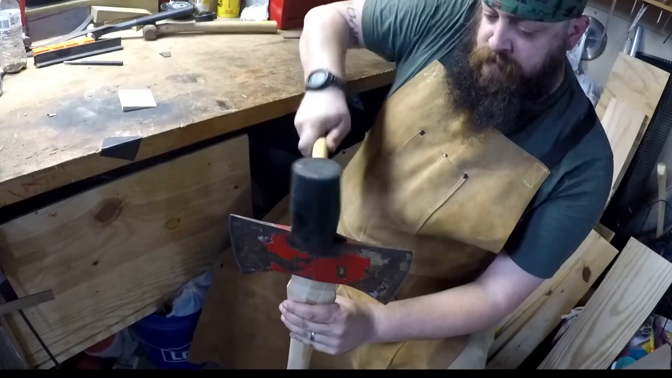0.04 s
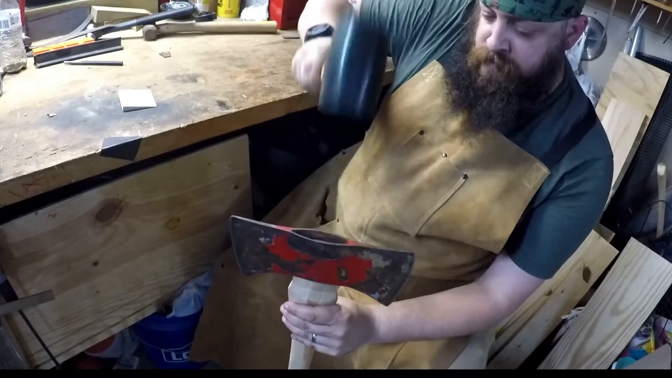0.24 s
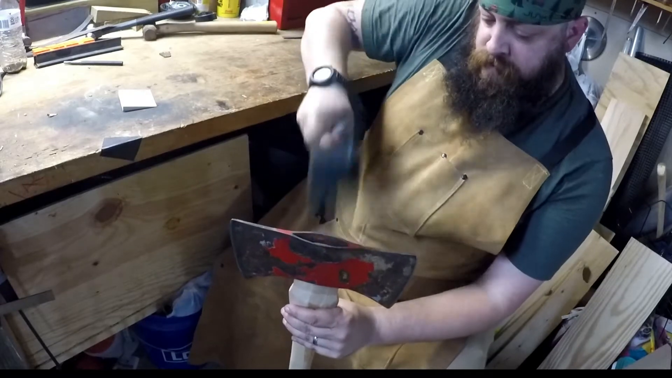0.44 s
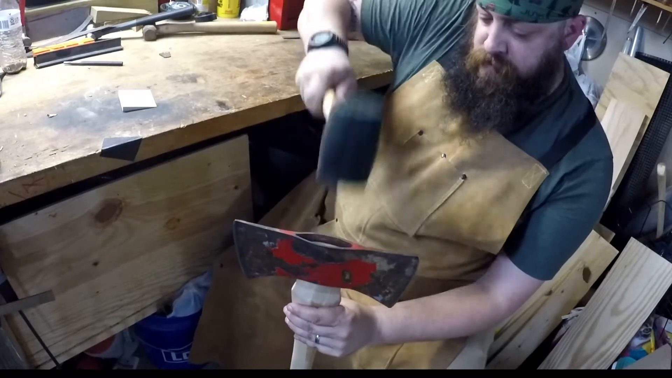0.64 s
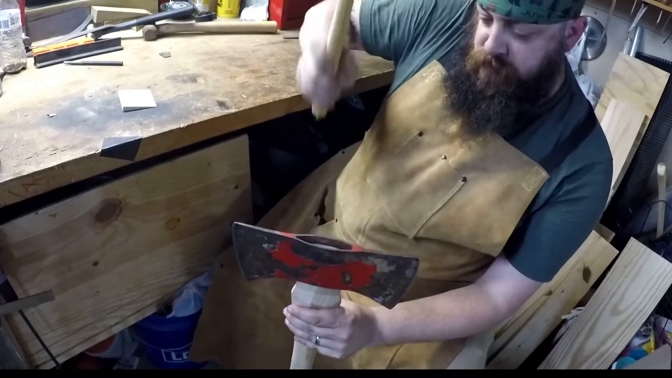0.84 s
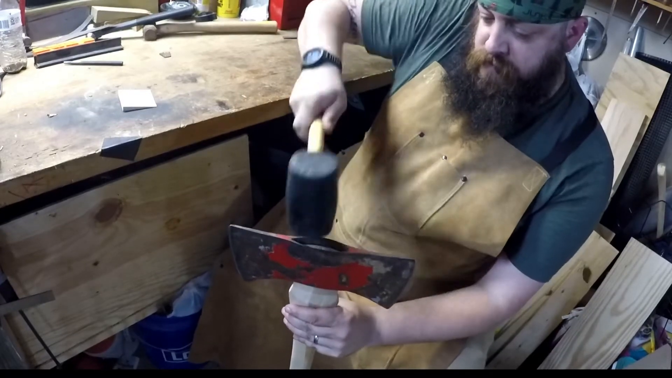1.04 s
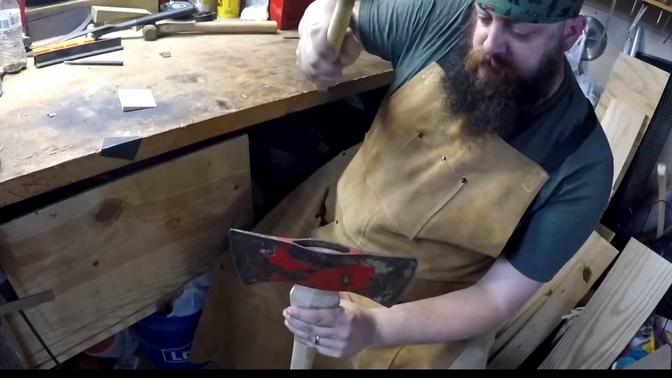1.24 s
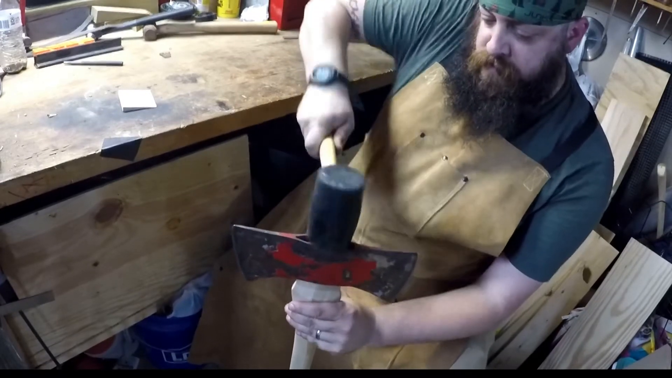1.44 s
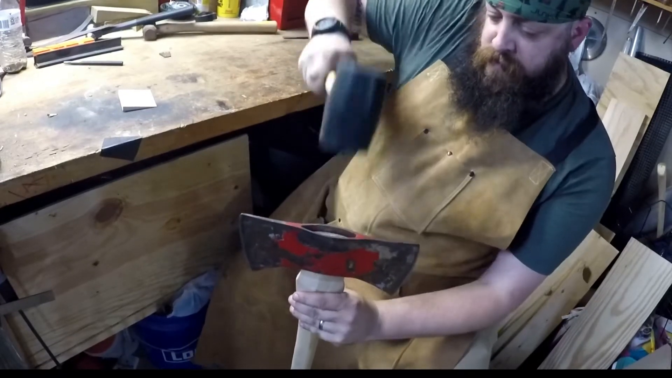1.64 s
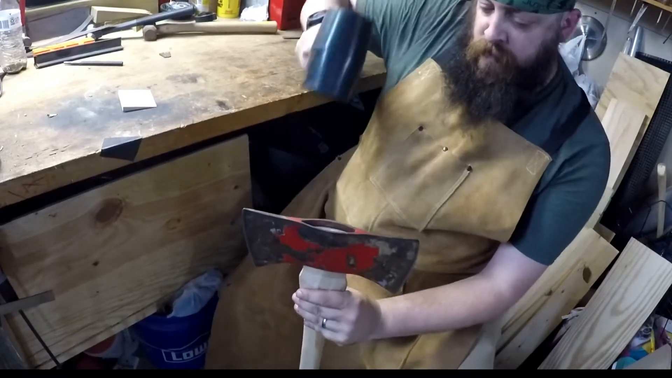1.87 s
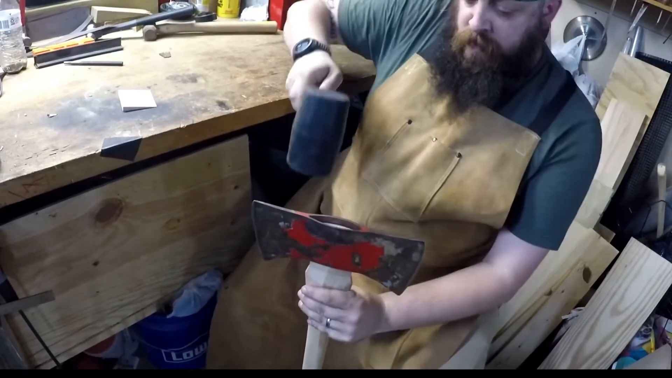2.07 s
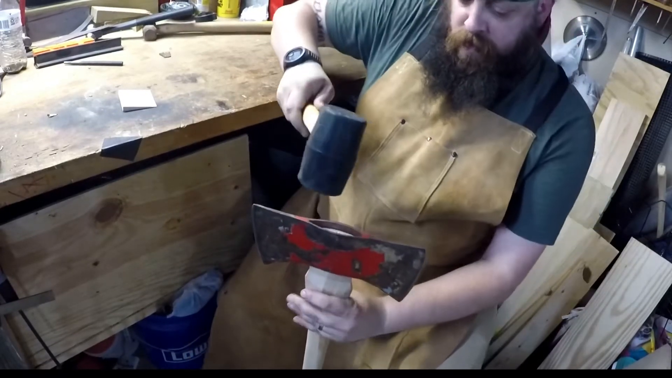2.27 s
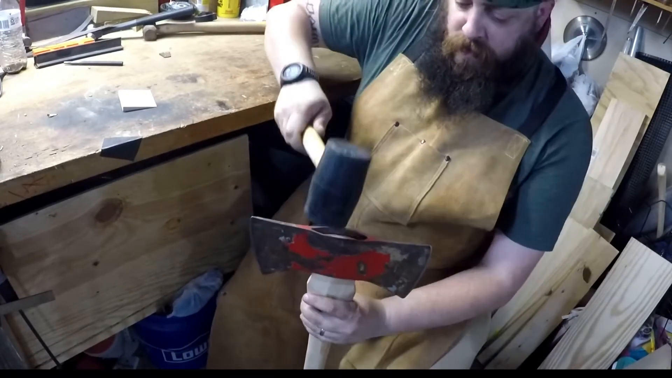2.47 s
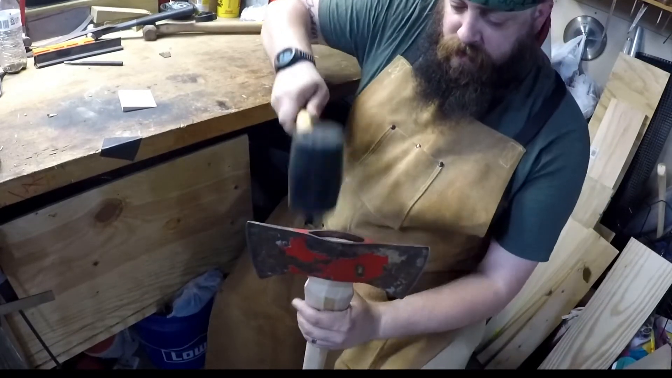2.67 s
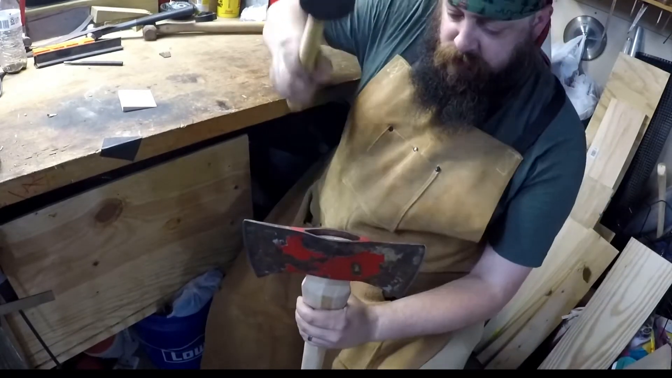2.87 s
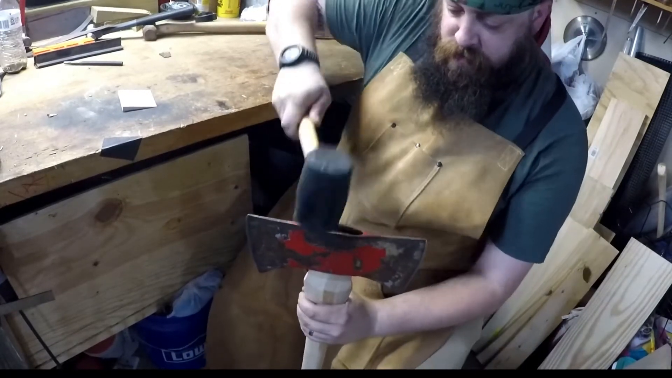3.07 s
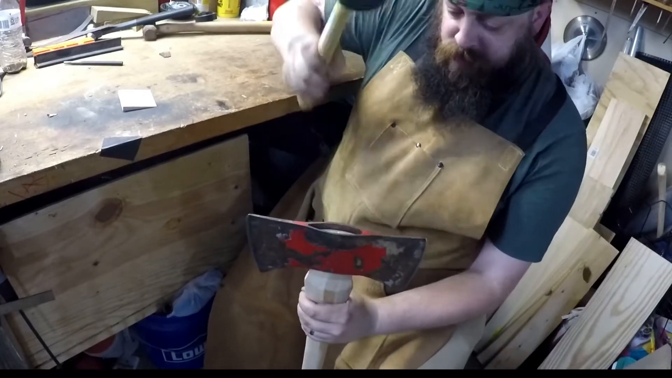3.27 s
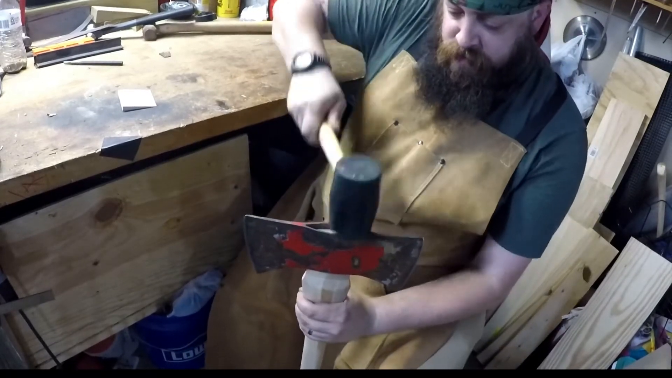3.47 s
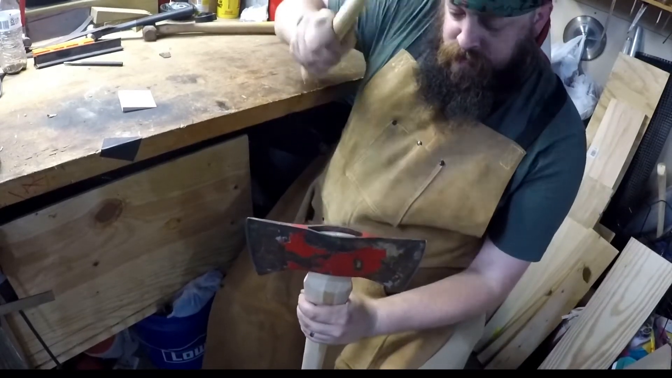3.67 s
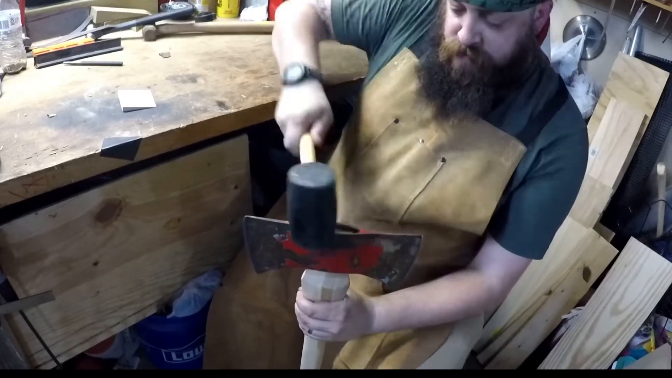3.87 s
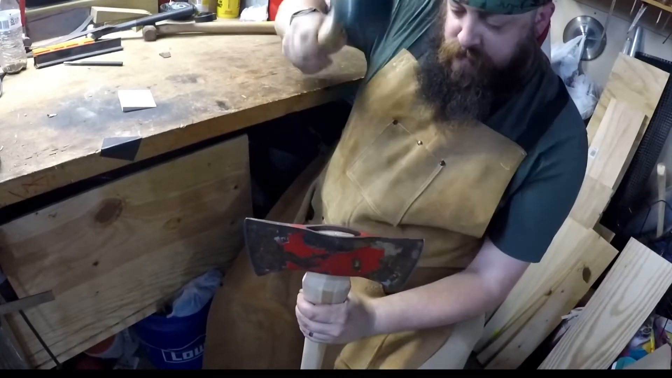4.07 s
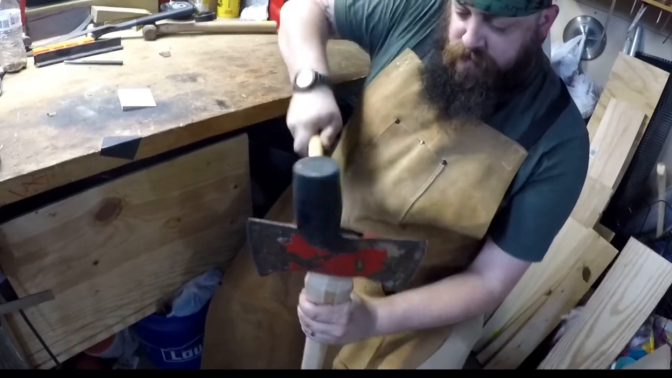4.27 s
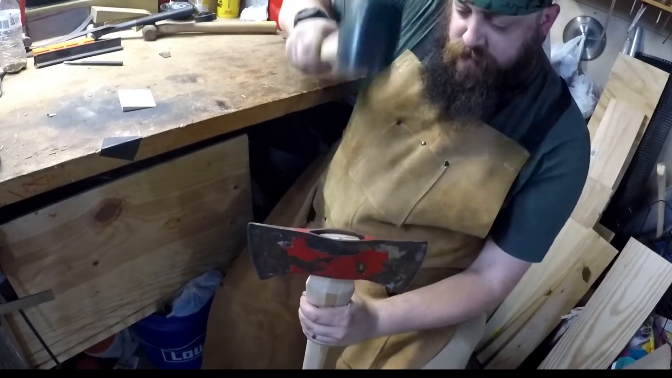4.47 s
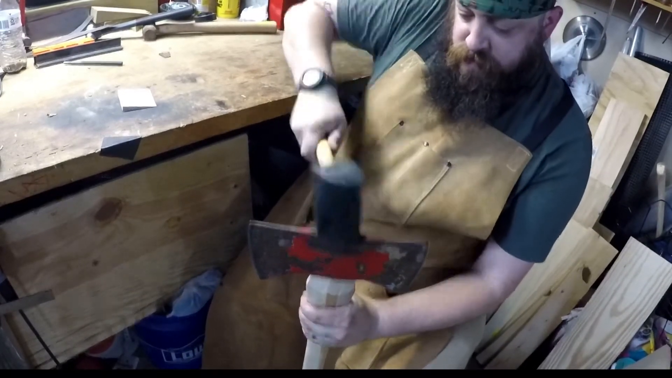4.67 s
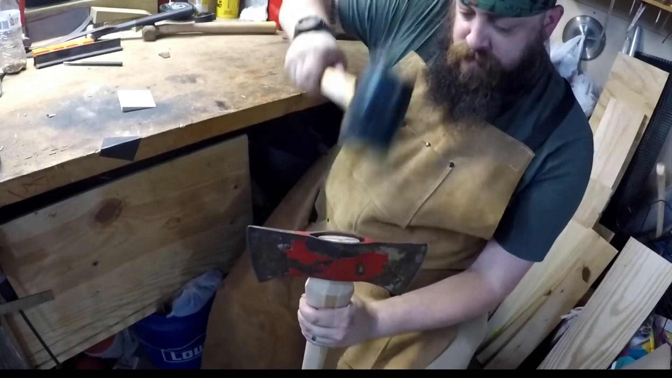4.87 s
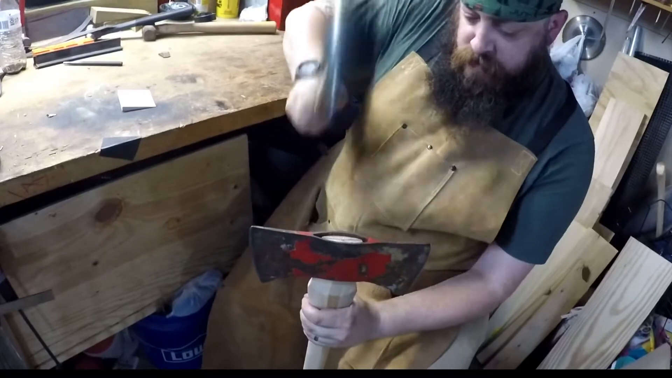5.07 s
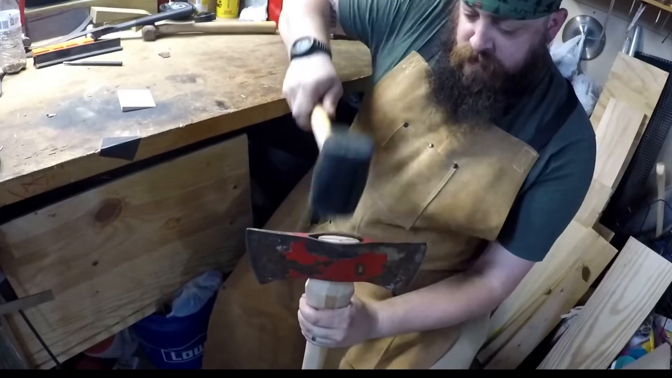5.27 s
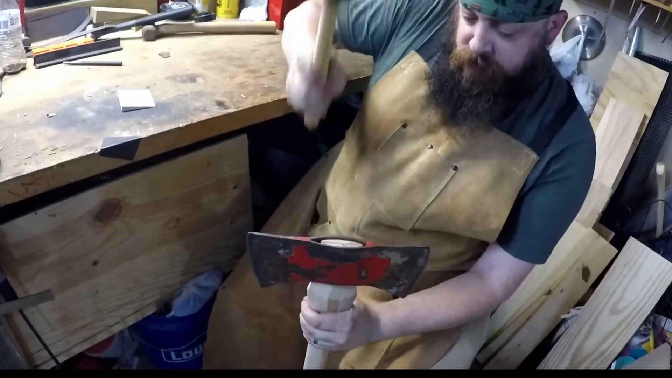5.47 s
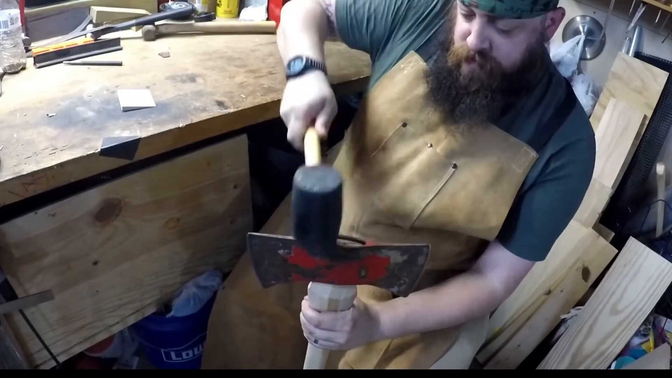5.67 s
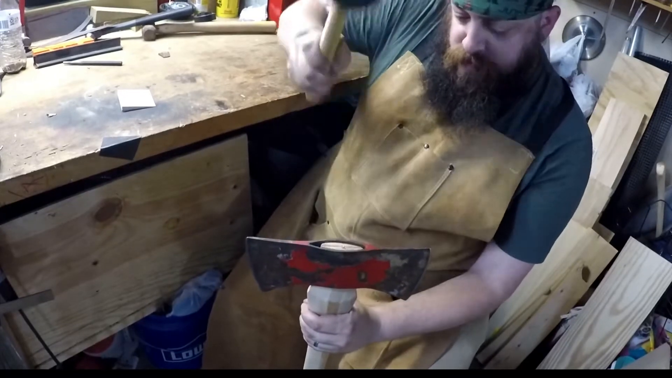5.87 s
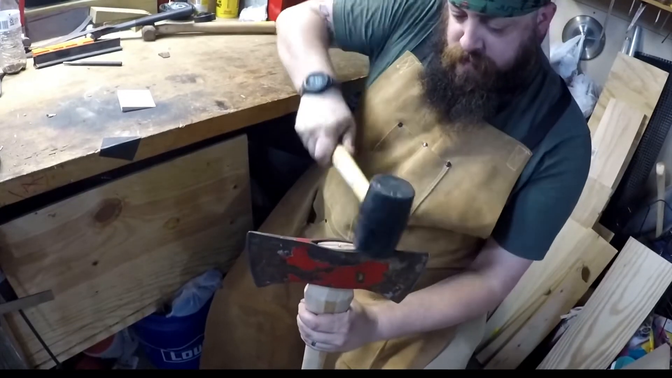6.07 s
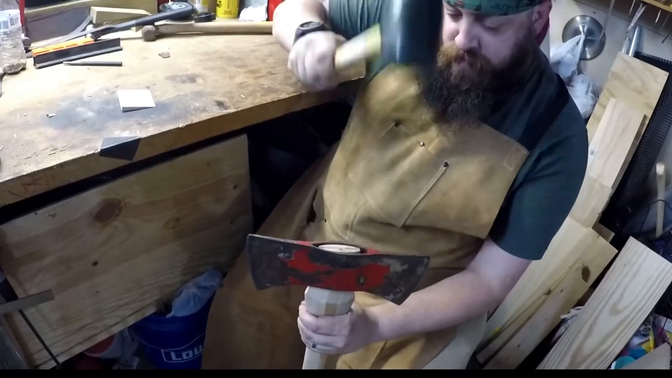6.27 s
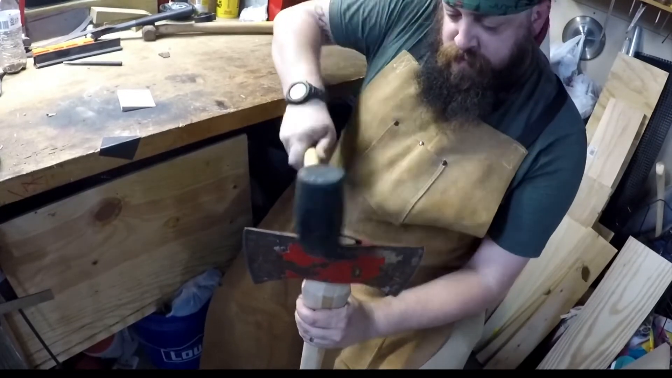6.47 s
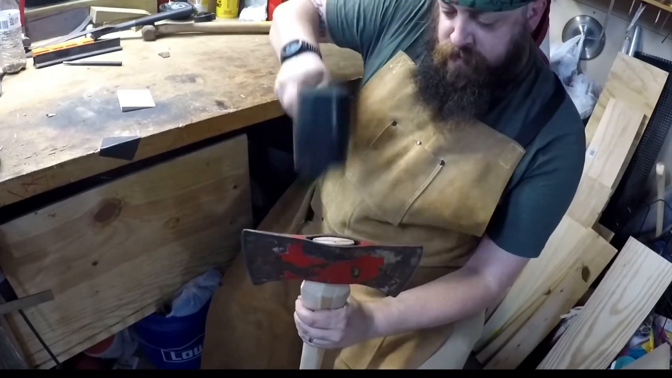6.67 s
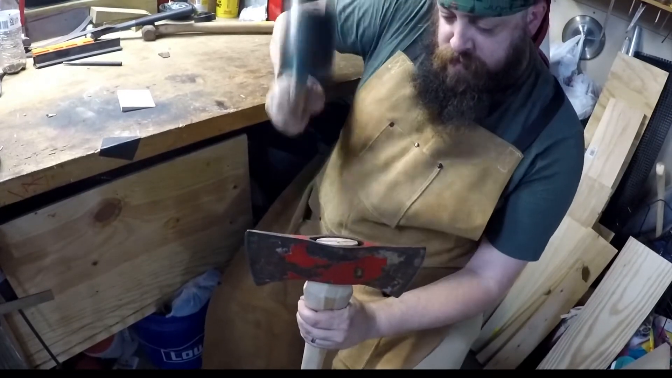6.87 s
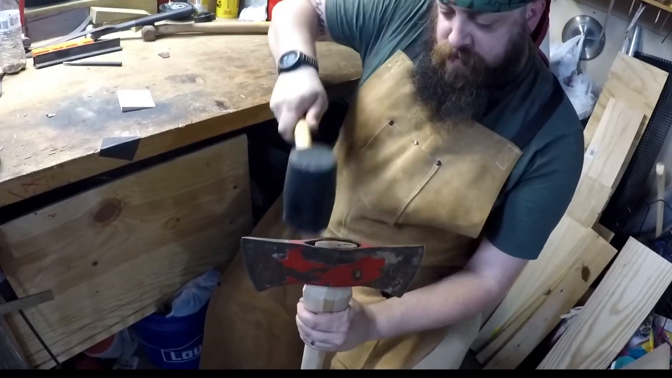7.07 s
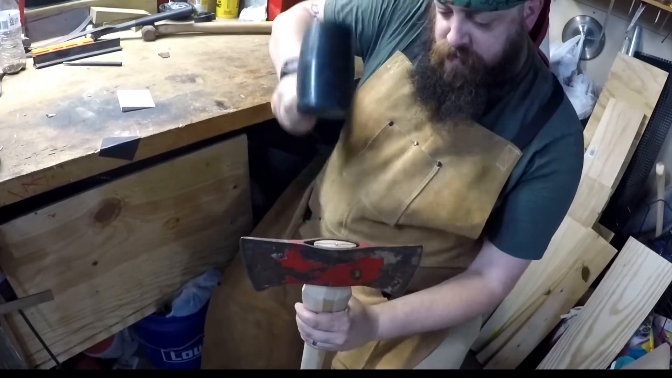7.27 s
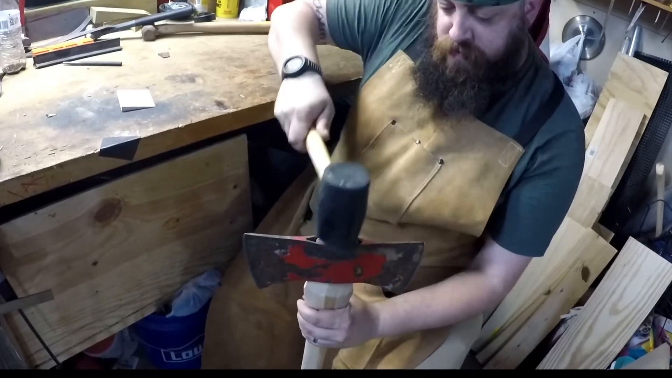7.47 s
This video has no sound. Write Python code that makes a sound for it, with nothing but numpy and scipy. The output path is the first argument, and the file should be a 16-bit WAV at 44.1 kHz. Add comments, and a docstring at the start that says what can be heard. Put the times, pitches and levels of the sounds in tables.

```python
"""Sharp, booming knocks, about two a second: a rubber mallet drives a steel axe head onto its handle.
Each blow rings the wooden handle and the low modes of a small workshop; the head cracks against
the wood and rings, and the walls answer briefly. Boom and knock fade as the head seats.
Hand and apron rustle in a pause while the grip changes, over a low room rumble.
A close camera overloads with a brief click at each attack, lifts the bass and limits the blows."""
import sys
import numpy as np
from scipy import signal
from scipy.fft import rfft, irfft
from scipy.io import wavfile
from scipy.ndimage import uniform_filter1d, minimum_filter1d

SR = 44100
rng = np.random.default_rng(int(sys.argv[2]) if len(sys.argv) > 2 else 0)


def transcribe(u):
    """Save the signal u as a 16-bit wav file named by the first command-line argument.

    u: samples, shape (n,) or (channels, n), limited to [-1, 1]; the rate is SR.
    q: integer samples, one column per channel.
    """
    v = np.clip(np.atleast_2d(u).T, -1, 1)
    q = np.round(v * 32767).astype(np.int16)
    wavfile.write(sys.argv[1], SR, q)


N = 331584
TIME = np.arange(N) / SR
AGE = np.arange(int(1.2 * SR)) / SR  # seconds since a blow


def mallet(settle_s=0.018):
    """Every blow: thump, wooden clack, crack, wall wash, steel ring and chink, plus an overload click."""
    # Each row: start in seconds, thump force in dB, contact hardness in dB.
    blows = [(0.3562, 0, 2.5), (0.8218, 0.5, 6), (1.3004, 2, 3), (2.4272, -4, -44), (2.8629, 0.5, -7),
             (3.2788, 0, 0.5), (3.7062, 0.5, -2.5), (4.1436, 0.5, 1), (4.574, 1, -0.5), (5.0143, 1.5, -2.5),
             (5.4555, 1, -7.5), (5.9, 0.5, -4.5), (6.349, 1.5, -2.5), (6.806, 1.5, -2.5),
             (7.2347, 3.5, -9.5)]
    # Three spectra. Each row: frequency in Hz, density in dB.
    clack_colour = [(200, -31.5), (450, 16), (750, 7.5), (1100, 4.5), (1600, 3.5), (2200, -10.5),
                    (3000, -17), (5000, -17.5), (7500, -23.5), (12000, -59)]
    wall_colour = [(60, -23), (200, 12), (450, -1), (850, -2.5), (1700, -7), (2400, -14.5), (3500, -20),
                   (4800, -11.5), (6200, -14.5), (7600, -26), (9300, -26.5), (11000, -42.5), (15000, -39.5)]
    chink_colour = [(1500, -10), (4500, 6), (8500, -12.5), (11000, -26), (15000, -25.5)]
    wood_pattern = noise(clack_colour, len(AGE))
    wall_pattern = noise(wall_colour, len(AGE))
    out = np.zeros(N)
    for start_s, force_db, hardness_db in blows:
        depth_db, knock_db, clack_db = contact(start_s, hardness_db)
        clack = dense_ring(wood_pattern, clack_colour, t60_s=0.07, rise_s=0.0031, fresh_share=0.13)
        wash = dense_ring(wall_pattern, wall_colour, t60_s=0.25, rise_s=0.0038, fresh_share=0.76)
        body = soften(thump(depth_db, knock_db), edge_hz=2200 * undb(0.95 * clack_db))
        add(out, start_s, undb(force_db) * body)
        add(out, start_s, undb(clack_db - 4.5) * clack)
        add(out, start_s, undb(hardness_db - 2.5) * crack())
        add(out, start_s, undb(-15) * walls(wash, clack_db, hardness_db))
        add(out, start_s, undb(1.5 + 0.66 * hardness_db) * steel())
        add(out, start_s, undb(clack_db - 23.5) * overload_click())
        chink = burst(chink_colour, t60_s=0.011)  # loose head drops back; heard after hard blows
        add(out, start_s + settle_s, undb(2 * hardness_db - 19) * chink)
    # low modes still ringing from a blow 0.11 s before the start
    add(out, 0, undb(0.5) * thump(0, 0)[int(0.11 * SR):])
    return out


def contact(start_s, hardness_db, firm_db=-4.5, off_centre_s=2.86):
    """Boom and knock fall as the head seats; a soft contact trades clack and knock for depth."""
    depth_fall_db_per_s, knock_fall_db_per_s = 1.13, 0.88
    softness_db = max(firm_db - hardness_db, 0)
    off_centre_db = 3.5 if abs(start_s - off_centre_s) < 0.2 else 0  # one blow knocks harder
    depth_db = 5.5 - depth_fall_db_per_s * start_s + 0.18 * softness_db
    knock_db = 4.5 - knock_fall_db_per_s * start_s - 0.12 * softness_db + off_centre_db
    clack_db = 1.8 - 0.51 * softness_db
    return depth_db, knock_db, clack_db


def thump(depth_db, knock_db, depth_hz=95, knock_hz=380, width_octaves=0.42):
    """Low modes of handle, bench and room; the contact weights the deep boom and the handle's knock."""
    # Each row: frequency in Hz, level in dB, t60 in seconds.
    body_modes = [(35.14, -38, 1.32), (51.47, -36.5, 1.4), (60.6, -40, 0.58), (79.25, -31.5, 0.64),
                  (90.37, -32, 0.61), (113.9, -30, 0.38), (132.83, -30, 0.62), (159.8, -17, 0.37),
                  (183.15, -22, 0.22), (227.1, -25, 0.33), (234.2, -27, 0.419), (254.3, -38.5, 0.32),
                  (303.2, -16.5, 0.16), (325.4, -16, 0.27), (363.2, -21.5, 0.17), (396.5, -18.5, 0.15),
                  (419.6, -13, 0.16), (460.5, -24.5, 0.18), (490.2, -26.5, 0.21), (548, -39, 0.21),
                  (617.5, -25, 0.2), (676.6, -29, 0.18), (740, -39.5, 0.17)]
    # Strong paths of the thump. Each row: delay in seconds, gain in dB.
    paths = [(0, -1), (0.0052, 2.5), (0.0156, -3), (0.032, -9.5), (0.047, -10.5)]
    hz, db, t60_s = np.transpose(body_modes)
    for boost_db, centre_hz in (depth_db, depth_hz), (knock_db, knock_hz):
        db = db + boost_db * np.exp(-(np.log2(hz / centre_hz) / width_octaves) ** 2)
    tones = ring(np.transpose([hz, db, t60_s]), detune=0.008, scatter_db=1.2)
    return -echoed(tones, paths)


def crack():
    """The steel eye jumps along the wood in one very short burst."""
    # Each row: frequency in Hz, density in dB.
    colour = [(300, 1.5), (900, -12.5), (2000, 3), (3000, 7.5), (3800, -1.5), (4800, 5), (6000, -24),
              (8500, -16), (11000, -44.5), (15000, -37.5)]
    # Direct sound, bench and floor bounces, head settling. Each row: delay in seconds, gain in dB.
    paths = [(0, 1.5), (.0032, -10.5), (.0062, -14), (0.0124, -8.5)]
    return echoed(burst(colour, t60_s=0.0081), paths)


def steel(sustain=1):
    """The axe head rings, damped by the wood; sustain scales the ring time."""
    # Each row: frequency in Hz, level in dB, t60 in seconds at sustain 1.
    head_modes = [(981, -27.5, 0.2), (1204, -39, .15), (1580, -21.5, .14), (1843, -32, 0.23),
                  (2955, -27, 0.11), (4470, -33, .04), (9050, -64.5, 0.17), (12850, -56, 0.32)]
    return ring(np.array(head_modes) * [1, 1, sustain], detune=0.003, scatter_db=1.5)


def walls(wash, clack_db, hardness_db, split_hz=2300):
    """The walls return the clack below the split and the crack above it."""
    dull = signal.sosfiltfilt(signal.butter(2, split_hz, fs=SR, output="sos"), wash)
    return undb(clack_db) * dull + undb(0.47 * hardness_db) * (wash - dull)


def overload_click():
    """Brief bright click of the recorder overloading at a blow's attack, made as a noise burst."""
    # Each row: frequency in Hz, density in dB.
    colour = [(2000, -9), (7000, 1.5), (15000, -3)]
    return burst(colour, t60_s=0.003)


def hands(flutter_per_s=25):
    """Hands scuff the tools, ring the head and slide on the wood; rustle and slide flutter together."""
    # Each row: start in seconds, level in dB, t60 in seconds, upper edge in Hz.
    scuffs = [(0.527, -36, 0.047, 4200), (1.656, -39.5, 0.35, 6500), (2.098, -48, .15, 1500),
              (2.267, -31.5, 0.12, 1020), (5.579, -47, .04, 2010), (7.328, -37, 0.071, 1201)]
    # Touches on the head. Each row: start in seconds, level in dB, ring time factor, upper edge in Hz.
    touches = [(1.658, -20, 2.5, 1300), (7.328, 2, .6, 520)]
    # Each row: frequency in Hz, density in dB.
    scuff_colour = [(200, -11), (900, 3.5), (1700, 1.5), (2700, -11), (4500, -6.5), (7000, -15),
                    (14000, -27)]
    flutter_db = 1.5 * np.interp(TIME * flutter_per_s, np.arange(1000), rng.standard_normal(1000))
    out = apron() * undb(flutter_db)
    for start_s, db, t60_s, edge_hz in scuffs:
        scuff = burst(scuff_colour, t60_s, rise_s=0.026 * t60_s)
        add(out, start_s, undb(db) * soften(scuff, edge_hz))
    for start_s, db, sustain, edge_hz in touches:
        add(out, start_s, undb(db) * soften(steel(sustain), edge_hz))
    return out + palm() * undb(flutter_db)


def apron(start_s=1.59, attack_s=0.51, hold_s=0.8, release_s=0.15, level_db=-41.5):
    """Cloth rustles while the grip changes."""
    # Each row: frequency in Hz, density in dB.
    colour = [(100, 6.5), (320, 5.5), (700, -3), (1500, -10.5), (3000, -23.5), (6000, -24.5),
              (10000, -29.5), (15000, -48)]
    corners_s = np.cumsum([start_s, attack_s, hold_s, release_s])
    return noise(colour, N) * np.interp(TIME, corners_s, [0, 1, 1, 0]) * undb(level_db)


def palm():
    """Skin hisses along the handle in short swishes."""
    # Each row: middle in seconds, level in dB, half length in seconds.
    slides = [(1.547, -53.5, 0.023), (1.99, -43, 0.049), (2.125, -53.5, 0.031), (2.285, -53.5, 0.026)]
    # Each row: frequency in Hz, density in dB.
    colour = [(400, -14), (1500, 0.5), (2800, -5.5), (5000, 1.5), (7000, -8), (10000, -16), (15000, -32)]
    envelope = sum(undb(db) * np.exp(-((TIME - mid_s) / half_s) ** 2) for mid_s, db, half_s in slides)
    return noise(colour, N) * envelope


def workshop(level_db=-46):
    """Low room rumble with a faint hiss."""
    # Each row: frequency in Hz, density in dB.
    colour = [(25, -3), (54, -1.5), (90, -3), (120, -10), (175, -2.5), (250, -15), (290, -13), (700, -23),
              (900, -20.5), (1760, -27.5), (3300, -41), (6000, -39.5), (9700, -37.5), (15000, -53.5)]
    return noise(colour, N) * undb(level_db)


def ring(modes, detune, scatter_db):
    """Struck modes; each blow lands differently and shifts their pitch and level."""
    draws = rng.standard_normal((len(modes), 2))
    tones = np.zeros(len(AGE))
    for (hz, db, t60_s), (pitch_draw, level_draw) in zip(modes, draws):
        tone = np.sin(2 * np.pi * hz * (1 + detune * pitch_draw) * AGE)
        tones += undb(db + scatter_db * level_draw) * fade(t60_s) * tone
    return tones * np.minimum(AGE / 0.0005, 1)


def dense_ring(pattern, colour, t60_s, rise_s, fresh_share):
    """Countless close modes: partly the same at every blow, partly new."""
    modes = np.sqrt(1 - fresh_share) * pattern + np.sqrt(fresh_share) * noise(colour, len(AGE))
    return modes * fade(t60_s) * (1 - np.exp(-AGE / rise_s))


def burst(colour, t60_s, rise_s=0.00015):
    """Coloured noise that swells quickly, then dies away."""
    swell = 1 - np.exp(-(AGE / rise_s) ** 2)
    return noise(colour, len(AGE), fade(t60_s)) * swell * (AGE < 1)


def soften(sound, edge_hz):
    """Low-pass: a soft contact lasts longer and loses treble."""
    return signal.sosfilt(signal.butter(2, min(edge_hz, SR / 3), fs=SR, output="sos"), sound)


def echoed(sound, paths):
    """Sum of arrivals along delayed paths."""
    out = np.zeros(len(sound))
    for delay_s, db in paths:
        add(out, delay_s, undb(db) * sound)
    return out


def noise(colour, size, envelope=1):
    """White noise, enveloped and then coloured; unit rms where the envelope is 1."""
    points_hz, points_db = np.transpose(colour)
    hz = np.maximum(np.fft.rfftfreq(size, 1 / SR), 1)
    gain = undb(np.interp(np.log(hz), np.log(points_hz), points_db))
    white = rng.standard_normal(size) * envelope
    return irfft(rfft(white) * gain / np.sqrt(np.mean(gain ** 2)), size)


def fade(t60_s):
    """Exponential decay, 60 dB down at t60_s."""
    return np.exp(-np.log(1000) * AGE / t60_s)


def undb(db):
    """Decibels to gain."""
    return 10 ** (np.asarray(db) / 20)


def add(track, start_s, sound):
    """Mix a sound into the track."""
    start = int(start_s * SR)
    part = sound[:max(len(track) - start, 0)]
    track[start:start + len(part)] += part


def bass_lift(sound, lift_db=9, edge_hz=268, width_hz=35):
    """Steep linear-phase bass shelf."""
    hz = np.fft.rfftfreq(2 * N, 1 / SR)
    shelf = np.clip((edge_hz - hz) / width_hz + 0.5, 0, 1)
    return irfft(rfft(sound, 2 * N) * undb(lift_db * shelf))[:, :N]


def limiter(sound, ceiling=0.88, release_s=0.016, window_samples=199):
    """Look-ahead peak limiter: ducks at once, recovers exponentially."""
    peak = -minimum_filter1d(-np.abs(sound[0]), size=window_samples)
    log_decay = TIME / release_s
    held = np.exp(np.maximum.accumulate(np.log(peak + 1e-9) + log_decay) - log_decay)
    return sound * uniform_filter1d(np.minimum(1, ceiling / held), size=window_samples)


def scene():
    """Blows, hands and room at one microphone."""
    return (mallet() + hands() + workshop())[None]


def record(dry):
    """The camera drops the deepest rumble, lifts the bass, limits the blows and cuts the top."""
    bottom_hz, top_hz = 32, 15200
    high_pass = signal.butter(4, bottom_hz, "high", fs=SR, output="sos")
    low_pass = signal.ellip(8, 0.2, 80, top_hz, fs=SR, output="sos")
    boomy = bass_lift(signal.sosfilt(high_pass, dry))
    return signal.sosfilt(low_pass, limiter(boomy))


dry = scene()
out = record(dry)
transcribe(out)
```